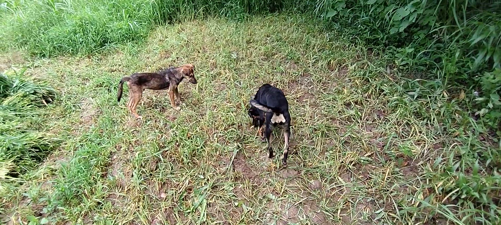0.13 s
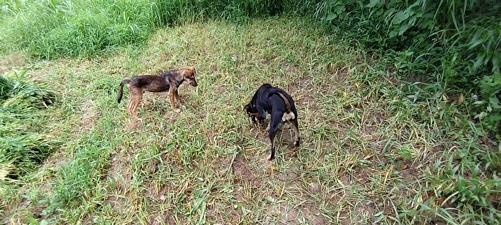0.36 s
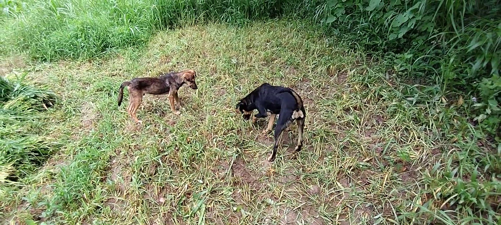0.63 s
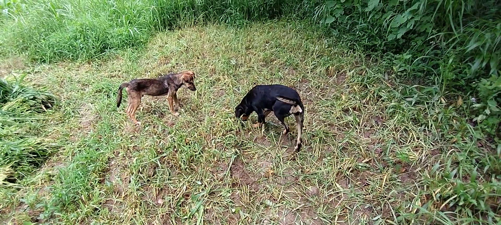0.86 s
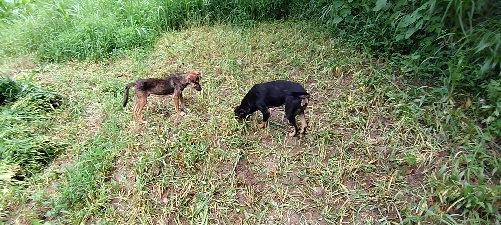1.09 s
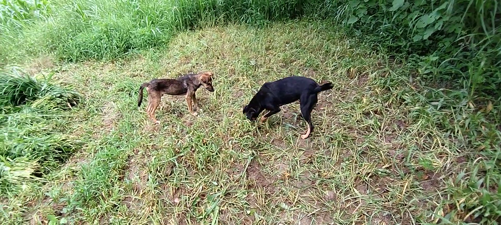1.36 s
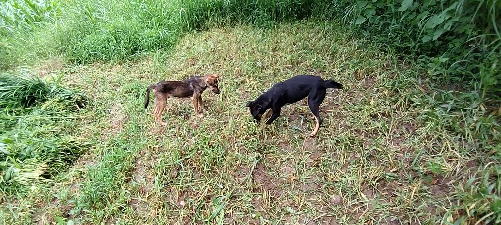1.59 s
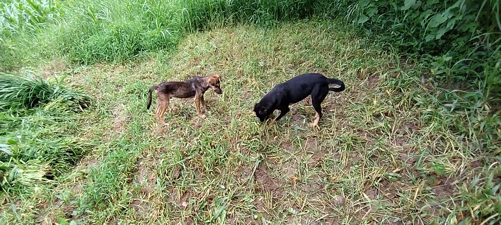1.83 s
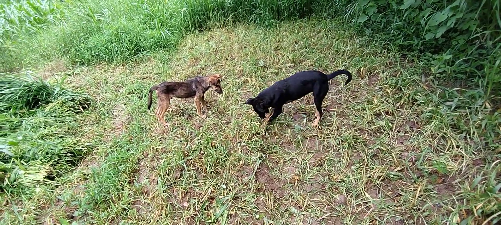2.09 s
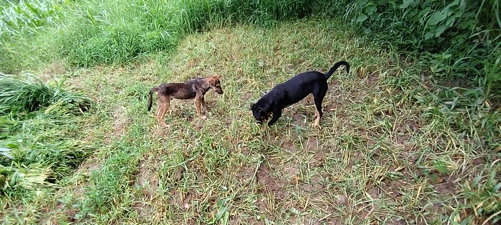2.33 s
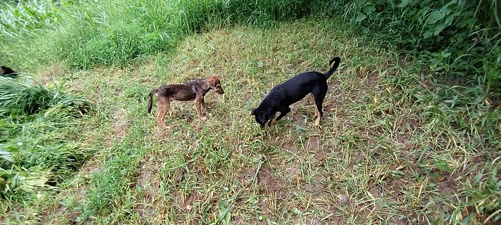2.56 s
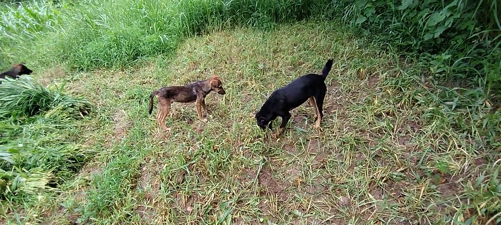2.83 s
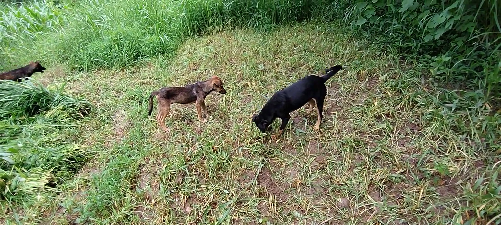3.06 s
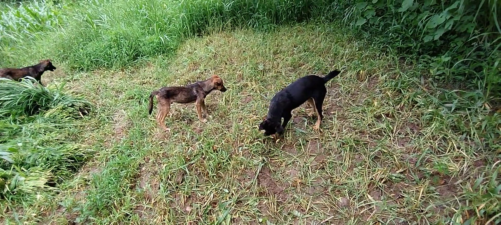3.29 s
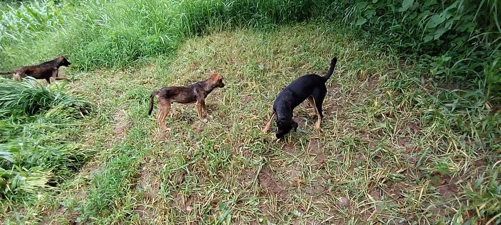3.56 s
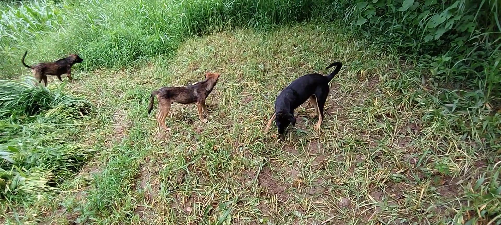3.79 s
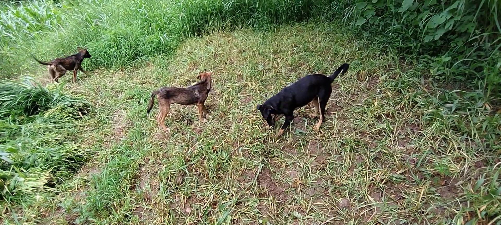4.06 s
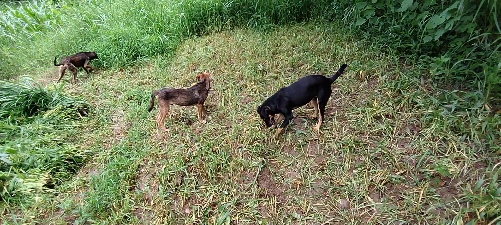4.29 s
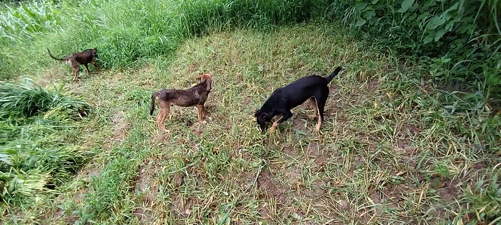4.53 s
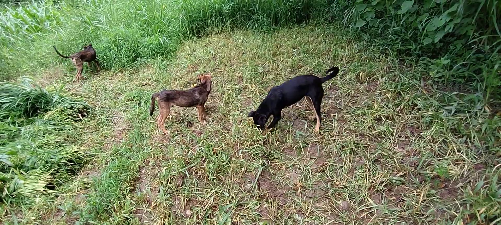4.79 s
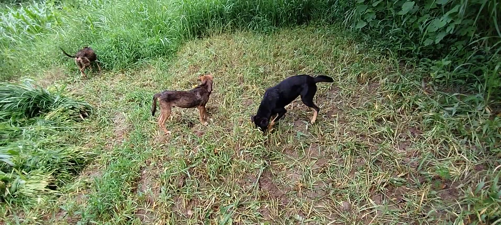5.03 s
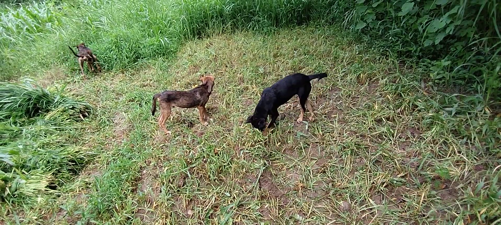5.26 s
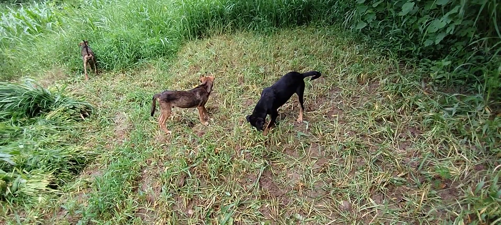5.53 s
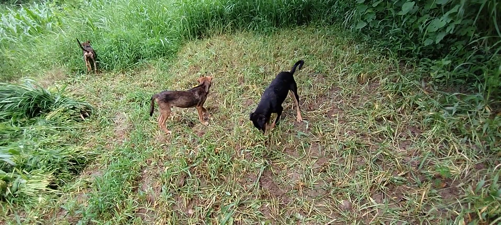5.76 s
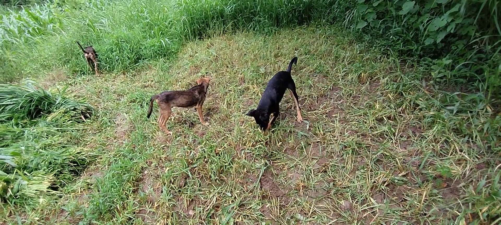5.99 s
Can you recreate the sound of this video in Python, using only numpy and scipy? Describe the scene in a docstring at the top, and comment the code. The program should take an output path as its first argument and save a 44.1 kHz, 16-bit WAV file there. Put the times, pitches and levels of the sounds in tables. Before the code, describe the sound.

Overgrown field by day, heard in stereo with little echo. High raspy trilling never stops; a slurred cricket chirps at once, pauses, then returns for a longer run. Low wind thumps puff on the left. Paws and muzzles crackle in grass to the right, with sharp stalk snaps, small buzzing insects, faint bird whistles and finally a short warbled call.

```python
"""An overgrown field by day. Rasping runs of falling tones make an insect's trill, over a hush of filtered noise.
At once a cricket chirps on the right in slurred tones, and again later; small insects buzz and tick in pulsed noise.
Soon wind puffs on the left microphone port as brief low swings, and dogs rustle the cut grass as crackling noise.
Dry stalks swish and snap as noise; far birds whistle in arched tones. Near the end a bird gives a warbled call."""
import sys
import numpy as np
from scipy import signal
from scipy.fft import rfft, irfft, next_fast_len
from scipy.io import wavfile
from scipy.ndimage import uniform_filter1d

SR = 44100
rng = np.random.default_rng(int(sys.argv[2]) if len(sys.argv) > 2 else 0)


def master_out(mix):
    """Clip the mix to full scale and print it as 16-bit PCM to the path in sys.argv[1]."""
    frames = np.transpose(np.atleast_2d(mix))
    ceiling = np.clip(frames, -1, 1)
    pcm = np.round(ceiling * 32767).astype(np.int16)
    wavfile.write(sys.argv[1], SR, pcm)


N = 270333  # length in samples
T = np.arange(N) / SR  # time in s


def gain_of(db):
    """Turns decibels into gain."""
    return 10 ** (np.asarray(db) / 20)


def evened(x):
    """Scales each channel to rms 1."""
    return x / np.sqrt(np.mean(x ** 2, -1, keepdims=True) + 1e-20)


def curve(rows, t=T):
    """Joins the rows of a table by straight lines in time, one curve for each column after the first."""
    s, *columns = np.transpose(rows)
    return [np.interp(t, s, c) for c in columns]


def colour(x, points):
    """Filters by a spectrum of (f/Hz, level/dB); white noise of rms 1 keeps about that rms."""
    size = next_fast_len(x.shape[-1])
    hz, db = np.transpose(points)
    bins = np.fft.rfftfreq(size, 1 / SR)
    gain = gain_of(np.interp(np.log(bins + 1), np.log(hz), db))
    gain = gain / np.sqrt(np.mean(gain ** 2))
    return irfft(rfft(x, size) * gain, size)[..., :x.shape[-1]]


def bell(hz, width):
    """Gives the spectrum of a resonance with steep skirts, 12 dB down at width Hz from its middle."""
    f = np.linspace(hz - 3 * width, hz + 3 * width, num=25)
    return np.c_[f, -12 * ((f - hz) / width) ** 2]


def add(mix, s, sound):
    """Adds a sound that starts at s seconds, cut off at the ends of the mix."""
    at = round(s * SR)
    part = mix[..., max(at, 0):max(at + sound.shape[-1], 0)]
    part += sound[..., max(-at, 0):][..., :part.shape[-1]]


def crackle(spread_db):
    """Makes two channels of noise whose samples differ widely in size, as tiny separate clicks."""
    size_db = spread_db * np.minimum(rng.exponential(1, N), 6)
    return evened(rng.standard_normal((2, N)) * gain_of(size_db))


def scatter(x, t60, delay):
    """Makes diffuse echoes off the growth, unlike in each channel, that die by 60 dB in t60 seconds."""
    t = np.arange(SR // 2) / SR
    tail = rng.standard_normal((2, len(t))) * gain_of(-60 * t / t60) * (t > delay)
    return signal.fftconvolve(np.atleast_2d(x), tail / np.linalg.norm(tail[0]), axes=1)[:, :N]


def pan(x, left_db, lag):
    """Places a source on the right: weaker on the left, and lag seconds later there (earlier if negative)."""
    return np.array([gain_of(left_db) * np.interp(T - lag, T, x), x])


def sweep(hz, gain, turn):
    """Makes a tone along a pitch curve, starting at a given part of a turn."""
    return gain * np.sin(2 * np.pi * (np.cumsum(hz) / SR + turn))


def patchy(x, depth_db):
    """Lets the level of noise drift in patches of time and pitch."""
    z = signal.stft(x, nperseg=1024, noverlap=768)[2]
    patches = rng.standard_normal(z.shape[1:])
    patches = uniform_filter1d(patches, size=5, axis=0)
    patches = uniform_filter1d(patches, size=30, axis=1)
    drifting = z * gain_of(depth_db * patches / patches.std())
    return signal.istft(drifting, nperseg=1024, noverlap=768)[1][:, :N]


def swells(rows, stir):
    """Gives the gain of a slowly changing stir with swells on it, each rising to its peak and dying away."""
    power = gain_of(2 * curve(stir)[0])
    for s, db, rise, fall in rows:
        drop = np.where(T < s, (s - T) / rise, (T - s) / fall)
        power = power + gain_of(2 * (db - 10 * drop))
    return np.sqrt(power)


# spectrum of the distant hush: f/Hz, relative left level/dB, relative right level/dB
HUSH_SPECTRUM = [(30, 1, 4), (90, 2.5, 13), (203, -5, -6.5), (500, -5.5, -20), (740, -9.5, -28),
                 (1440, -12, 5), (2230, -9.5, -15.5), (3240, -13.5, 0), (4940, -31, 4.5), (7100, -10, -34),
                 (10400, -12, -22.5), (15400, -15, 7)]
# the swelling parts before patchiness: t/s, low part level/dB, middle part level/dB
BREEZE_LEVELS = [(0, -69, -69), (.5, -66, -71), (.75, -72, -74), (1.1, -63, -68), (1.7, -75, -77),
                 (2.2, -69, -75), (2.8, -75, -73), (3.6, -76, -80), (4.2, -66, -73), (4.7, -76, -81),
                 (5.5, -69, -76), (6.13, -69, -73)]
# spectrum of the low part: f/Hz, relative level/dB
LOW_SPECTRUM = [(120, -5), (220, 0), (340, -1.5), (520, 0), (700, -10), (1600, -60)]
# spectrum of the middle part: f/Hz, relative level/dB
MIDDLE_SPECTRUM = [(400, -30), (700, -3), (1100, 0), (1500, -5), (1900, -3), (3000, -50)]


def hush():
    """Smooth distant noise, partly alike in both ports; its low and middle parts swell and sink."""
    a, b, low, middle = rng.standard_normal((4, N))
    table = np.array(HUSH_SPECTRUM)
    low_db, middle_db = curve(BREEZE_LEVELS)
    left = gain_of(-1.5) * colour(a, table[:, [0, 1]])
    right = colour(0.1 * a + 0.54 * b, table[:, [0, 2]])
    low_swell = gain_of(low_db) * colour(low, LOW_SPECTRUM)
    middle_swell = gain_of(middle_db) * colour(middle, MIDDLE_SPECTRUM)
    steady = gain_of(-61) * np.array([left, right])
    return patchy(steady + low_swell + middle_swell, 2.55)


# wind puffs on the left port: t/s of the middle, peak level/dB of the envelope, f/Hz
WIND_PUFFS = [(0.27, -39.5, 73), (0.287, -40, 70), (0.352, -40, 87), (0.497, -30.5, 85.6),
              (0.636, -42.5, 86.8), (0.839, -40.1, 87.1), (0.869, -46.4, 79), (0.91, -36.5, 79.6),
              (0.938, -35, 75), (0.971, -27, 91), (1.05, -31.5, 81), (1.571, -40.5, 80), (1.879, -44, 63),
              (2.291, -45, 67.24), (2.336, -39, 67), (2.449, -34.8, 81), (2.66, -38.5, 70),
              (2.697, -34.5, 74), (4.755, -40.5, 71), (4.787, -44.7, 76.1), (4.928, -36.9, 77),
              (4.961, -36.5, 81), (5.32, -44, 88.16), (5.679, -37.5, 80), (5.803, -30.5, 85.5),
              (6.118, -39, 83.76)]
# spectrum of the small puffs: f/Hz, relative level/dB
RUMBLE_SPECTRUM = [(15, -8), (40, -7.5), (75, -0.5), (115, -7.5), (170, -14), (400, -67)]
# strength of the small puffs before balance: t/s, level/dB
GUST_LEVELS = [(0.0, -76), (0.94, -61.5), (1.16, -70.5), (3.98, -76.5), (6.13, -69)]


def wind():
    """Each puff swings the left membrane for a cycle or two; small ones come at random between."""
    left = np.zeros(N)
    t = np.arange(-.03, .03, 1 / SR)
    for s, db, hz in WIND_PUFFS:
        swing = np.cos(2 * np.pi * (hz * t + rng.random()))
        add(left, s - .03, gain_of(db) * swing * np.exp(-(t * hz / 0.51) ** 2))
    small = colour(crackle(11.2) * gain_of(curve(GUST_LEVELS)[0]), RUMBLE_SPECTRUM)
    small = small * gain_of([[8], [.5]])
    return small + np.array([left, gain_of(-41) * left])


# a far drone of insects, low in pitch, before balance: t/s, level/dB
DRONE_LEVELS = [(1.45, -82), (1.7, -66), (3.0, -69), (4.2, -59), (4.6, -76), (6.13, -75)]


def insect_drone():
    """Far insects merge into a crackling band of noise."""
    drone = colour(crackle(4.5) * gain_of(curve(DRONE_LEVELS)[0]), bell(2180, 216))
    return drone * gain_of([[-6], [0]])


# other trillers further off, before balance: t/s, level/dB
FAR_TRILLERS = [(0, -34), (.3, -46), (.9, -49.5), (1.15, -40.5), (1.6, -51), (2.0, -47), (2.5, -42.5),
                (2.85, -53), (3.55, -42), (3.75, -52), (4.12, -52), (4.55, -40.5), (4.85, -50), (5.15, -45),
                (5.45, -55), (5.72, -52), (6.13, -43)]


def far_chorus():
    """Other trillers further off merge into a crackling band of noise that swells and sinks."""
    level = gain_of(curve(FAR_TRILLERS)[0]) * gain_of([[-2.5], [1.5]])
    return level * colour(crackle(3.4), bell(5580, 590))


def tone(rows):
    """A whistle along a pitch curve, with a fast warble and a weak octave."""
    hz, db = curve(rows)
    warble = .06 * np.sin(2 * np.pi * 76 * T)  # a share of the pitch, 76 times a second
    turn = 2 * np.pi * np.cumsum(hz * (1 + warble)) / SR
    on = (T > rows[0][0]) & (T < rows[-1][0])
    return np.sqrt(2) * gain_of(db) * on * (np.sin(turn) + 0.078 * np.sin(2 * turn))


# warbled call: t/s, f/Hz that the warble swings around, level/dB
CALL_PITCH = [(5.735, 1120, -68), (5.77, 1320, -51), (5.81, 1437, -40), (5.85, 1422, -40),
              (5.90, 1344, -40), (5.945, 1247, -44), (5.955, 1260, -48)]
# falling end of the call: t/s, f/Hz that the warble swings around, level/dB
FALLING_END = [(5.935, 1983, -54), (5.955, 1683, -45), (5.975, 1494, -47), (6.01, 1150, -65)]
# far whistles: t/s of the start, length/s, highest f/Hz, level/dB at the middle
FAR_WHISTLES = [(.69, .15, 1170, -70), (.86, .045, 1163, -62), (4.72, .09, 1060, -73),
                (4.92, .14, 1160, -71), (5.41, .25, 1160, -70)]


def birds():
    """The near call from the right with its falling end, and faint far whistles, with their echoes."""
    call = tone(CALL_PITCH) + tone(FALLING_END)
    far = np.zeros(N)
    for s, length, hz, db in FAR_WHISTLES:
        arch = np.sin(np.pi * np.arange(0, length, 1 / SR) / length)
        arched_hz = hz * (1 + .05 * (arch - 1))
        add(far, s, sweep(arched_hz, np.sqrt(2) * arch * gain_of(db), rng.random()))
    echo = scatter(call + far, 0.46, 0.0074) * gain_of([[-15], [-7]])
    return pan(call, -18, 0.00038) + pan(far, -5, 0.00017) + echo


# buzzes of a small insect to the left, before balance: t/s of the start, level/dB
BUZZ_BOUTS = [(.05, -67), (.35, -68), (.65, -67), (.95, -68), (3.98, -69), (4.468, -65), (4.763, -64),
              (5.063, -64), (5.352, -65), (5.658, -63), (6.03, -62)]


def buzzer():
    """A small insect on the left buzzes: noise in a narrow band, pulsing fast in short growing bouts."""
    length = .087  # s
    t = np.arange(0, length, 1 / SR)
    pulses = np.sqrt(t / length) * 2 * np.sin(np.pi * 52 * t) ** 2  # 52 pulses a second
    gate = np.zeros(N)
    for s, db in BUZZ_BOUTS:
        add(gate, s, gain_of(db) * pulses)
    return colour(crackle(1.9) * gate, bell(8620, 280)) * gain_of([[2], [-7]])


# a ticking insect to the right, before balance: t/s, level/dB
TICK_LEVELS = [(4.9, -90), (5.3, -66), (5.9, -60), (6.13, -61)]


def ticker():
    """An insect on the right grows louder: two bands of noise pulse on a steady beat."""
    beat = np.sin(np.pi * (T - 5.83) / .0578) ** 2  # one pulse every .0578 s
    gate = beat * gain_of(curve(TICK_LEVELS)[0])
    high = colour(crackle(2.5) * gate, bell(10600, 380))
    lower = gain_of(-9) * colour(crackle(1.4) * gate, bell(9300, 300))
    return (high + lower) * gain_of([[-6], [2.5]])


# spectrum of the dry stalks: f/Hz, relative level/dB
STALK_SPECTRUM = [(4000, -56), (6800, -8), (7700, -2), (8140, -6), (9950, -4.5), (14100, -9),
                  (15500, -12.5)]
# swishes of dry stalks before balance: t/s of peak, peak level/dB, s to rise the last 10 dB, s to fall 10 dB
STALK_SWISHES = [(.88, -62, .06, .06), (1.265, -48, .06, .035), (1.50, -57, .12, .1),
                 (1.737, -55, .02, .05), (1.86, -55, .07, .08), (2.14, -45, .16, .09),
                 (2.345, -52, .04, .05), (2.605, -42, .035, .14), (2.85, -53, .06, .08),
                 (3.86, -61, .1, .05), (4.346, -61, .2, .2), (5.84, -62, .15, .1)]
# the stir of stalks between them, before balance: t/s, level/dB
STALK_STIR_LEVELS = [(0, -73), (.8, -72), (1.1, -68), (1.65, -67), (2.4, -59), (3.45, -59), (4.0, -70),
                     (4.7, -72), (6.13, -63)]


def stalks():
    """Dry stalks swish, mostly on the left: dense bright crackle that swells and dies away."""
    moving = crackle(4.6) * swells(STALK_SWISHES, STALK_STIR_LEVELS)
    return colour(moving, [(3000, -19)] + list(STALK_SPECTRUM)) * gain_of([[3.5], [-5]])


# spectrum of the rustling grass: f/Hz, relative level/dB
GRASS_SPECTRUM = [(250, -11), (600, -13), (900, -10), (1500, -17), (2100, -4), (3000, 1), (4200, 4),
                  (6000, -10), (9000, -13.5), (15000, -29)]
# paws and muzzle push through the grass, before balance:
# t/s of peak, peak level/dB, s to rise the last 10 dB, s to fall 10 dB
PAW_RUSTLES = [(.56, -57, .15, .05), (.9, -49, .06, .045), (1.03, -50, .06, .08), (1.125, -47, .1, .05),
               (1.265, -46.5, .08, .05), (2.166, -54, .2, .3), (2.535, -52, .06, .3), (3.78, -56, .08, .05),
               (4.126, -55, .25, .2), (4.351, -49, .02, .07), (4.65, -56, .2, .25), (5.259, -56, .07, .06),
               (5.842, -54, .04, .15)]
# the stir of grass between them, before balance: t/s, level/dB
GRASS_STIR_LEVELS = [(0, -61), (.78, -64), (1.4, -58), (1.9, -63), (2.65, -52), (3.3, -54.5), (3.7, -59),
                     (5.1, -61), (6.13, -68)]


def dogs_in_grass():
    """Dogs' paws and muzzle push through the grass on the right: patchy crackle in swells."""
    rustle = colour(crackle(3.6) * swells(PAW_RUSTLES, GRASS_STIR_LEVELS), GRASS_SPECTRUM) * gain_of(5.5)
    rustle = patchy(rustle, 2.35)
    loose = gain_of([[-16], [-99]]) * rustle  # a little unlike sound, on the left only
    return pan(rustle[1], -18, -0.00037) + loose


# stalks snap: t/s, level/dB before balance, left trim/dB before balance
STALK_SNAPS = [(0.819, -54.5, -17), (2.329, -47.5, -11), (2.505, -53, -23), (2.531, -50, -20),
               (3.573, -52, -11), (3.776, -43, -25), (4.19, -54, -18), (4.339, -36, -24), (4.353, -41, -28),
               (5.219, -56, -20), (5.258, -49.5, -25)]
# spectrum of a snap: f/Hz, relative level/dB
SNAP_SPECTRUM = [(500, -18), (2000, 0.5), (4000, 10), (7500, -2), (10500, -6), (15000, -26)]


def snapping_stalks():
    """Single stalks snap: bursts of noise that start at full strength and die within milliseconds."""
    snaps = np.zeros((2, N))
    t = np.arange(2000) / SR
    for s, db, left_db in STALK_SNAPS:
        crack = rng.standard_normal(len(t)) * np.exp(-t / .006)
        add(snaps, s, gain_of([[db + 15 + left_db], [db + 9]]) * crack)
    return colour(snaps, SNAP_SPECTRUM)


# cricket chirps: t/s of first stroke, length/s, level/dB before the chirp's shape, filter and balance
CRICKET_CHIRPS = [(.007, 0.019, -22.5), (.080, 0.068, -26), (.220, 0.067, -25), (0.36, 0.059, -24),
                  (0.475, 0.067, -25), (0.619, 0.05, -25.5), (2.2, .025, -38), (2.248, 0.049, -34),
                  (2.326, 0.08, -31), (2.446, 0.083, -29.5), (2.566, 0.076, -27.5), (2.681, 0.067, -28),
                  (2.788, 0.082, -31), (2.931, 0.086, -29.5), (3.059, .08, -29), (3.191, 0.077, -29.5),
                  (3.332, 0.092, -31)]
# one cricket stroke: t/s from its peak, relative level/dB, pitch shift f/Hz
CRICKET_STROKE = [(-.013, -29, 212), (-.008, -6.5, 138), (-.0025, -11, 34), (0, -1, -120),
                  (.002, 2.5, -290), (.004, -32, -380)]
# how the song changes: t/s, relative level/dB of strokes between the beats, wing pitch f/Hz before
# each stroke's shift, relative level/dB of the bounce off the ground
CRICKET_SONG = [(.1, -10, 4320, -9), (.65, -20, 4280, -9), (2.25, -10, 4040, -14), (2.65, -3, 4310, -4),
                (3.4, -2, 4310, -3)]


def cricket():
    """Each stroke swells on the wing pitch and ends in a short hard down-slur, a little rough."""
    voice = np.zeros(N)
    t = np.arange(CRICKET_STROKE[0][0], CRICKET_STROKE[-1][0], 1 / SR)
    shape_db, shift = curve(CRICKET_STROKE, t)
    for s, length, db in CRICKET_CHIRPS:
        between_db, hz = curve(CRICKET_SONG, s)[:2]
        draws = rng.standard_normal((16, 3))
        beats = np.arange(0, length + .05, .0223 / 2)  # every second one falls between the beats
        for k, beat in enumerate(beats):
            loudness, tune, turn = draws[k]
            arch_db = -170 * max(.035 - beat, 0) - 400 * max(beat - length, 0)
            level_db = db + arch_db + between_db * (k % 2) + 1.2 * loudness
            stroke = sweep(hz + shift + 30 * tune, gain_of(level_db + shape_db), 9 * turn)
            add(voice, s + beat + t[0], stroke)
    bounce = gain_of(curve(CRICKET_SONG)[2]) * np.interp(T - .003, T, voice)
    flutter = colour(rng.standard_normal(N), [(20, 0), (400, 0), (900, -30)])
    voice = (voice + bounce) * (1 + .27 * flutter)
    voice = colour(voice, bell(4200, 650)) * gain_of(-14.7)  # the wings pass only their own band
    echoes = scatter(voice, .11, .001)
    return pan(voice, -25, -0.00068) + gain_of([[-23], [-4]]) * echoes


# phrases of the trill, each running until the next: t/s of first throb, s between throbs, throb length/s
TRILL_PHRASES = [(.001, .091, .054), (.569, .0885, .04), (.94, .089, .04), (1.647, .0905, .042),
                 (2.379, .0995, .042), (2.794, .091, .048), (3.135, .0895, .06), (3.768, .087, .052),
                 (4.144, .0865, .048), (4.804, .0955, .046), (5.379, .089, .044)]


def throbs():
    """Each phrase repeats at its own pace until the next one begins: rows of (t/s, length/s)."""
    ends = [row[0] for row in TRILL_PHRASES[1:]] + [T[-1]]
    rows = []
    for (start, gap, length), end in zip(TRILL_PHRASES, ends):
        rows += [(s, length) for s in np.arange(start, end - gap / 2, gap)]
    return rows


# wing resonance that colours the rasp: f/Hz, relative level/dB
WING_RESONANCE = [(2710, -65), (4600, -17), (4900, -15.5), (5310, -2), (5650, -2.5), (6220, -2),
                  (6370, -20.5), (6510, -16), (6900, -24.5), (8970, -31), (15200, -120)]
# level of the throbs before random spread, fading and balance: t/s, level/dB
THROB_LEVELS = [(0, -37), (.8, -36), (1.15, -35), (1.45, -42), (1.6, -44), (1.75, -35.5), (2.7, -36.5),
                (2.8, -44), (3.05, -43), (3.2, -35.5), (3.45, -35), (3.78, -37.5), (3.9, -44), (4.3, -35.5),
                (4.75, -41), (4.95, -45), (5.2, -40), (5.4, -43.5), (5.6, -39.5), (6.13, -38)]


def trill():
    """Each throb is a run of wing strokes that fall in pitch and rasp, blurred by the growth around."""
    tones = np.zeros(N)
    t = np.arange(0, .016, 1 / SR)
    shape = np.minimum(t / .003, 1) * np.cos(np.pi / 2 * t / t[-1])
    chance = rng.standard_normal((90, 12, 4))
    for (s, length), draws in zip(throbs(), chance):
        db = curve(THROB_LEVELS, s)[0] + draws[-1, 0]  # throbs differ by about 1 dB
        for beat, (size, tune, late, turn) in zip(np.arange(0, length + .03, .0135), draws):
            fade_db = -50 * beat - 400 * max(beat - length, 0) - 2 * (beat == 0)
            hz = 6080 + 110 * tune - 38000 * t - 3000 * beat
            stroke = sweep(hz, gain_of(db + fade_db + 1.3 * size) * shape, 9 * turn)
            add(tones, s + beat + .0016 * late * (beat > 0), stroke)
    rasp = colour(crackle(2.36) * abs(tones), WING_RESONANCE) * gain_of([[-3], [3]])
    near = pan(tones, -15.5, -0.000388) * gain_of(6.0) + rasp
    return near + gain_of([[-7.5], [-3.5]]) * scatter(near[1], 0.055, .002)


def scene():
    """All sources together, from the background to the trill."""
    background = hush() + wind() + insect_drone() + far_chorus() + birds()
    ticking = buzzer() + ticker()
    grass = stalks() + dogs_in_grass() + snapping_stalks()
    return background + ticking + grass + cricket() + trill()


def low_pass(x):
    """Removes everything above the highest recorded frequency."""
    return signal.sosfilt(signal.butter(12, 15690, fs=SR, output="sos"), x)


def record(dry):
    """Turns the finished mix into the final sound."""
    return low_pass(dry)


dry = scene()
out = record(dry)
master_out(out)
```